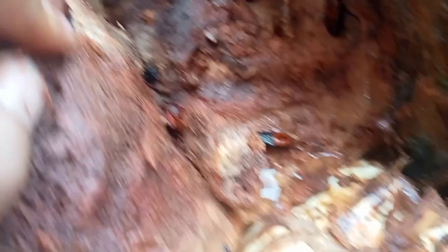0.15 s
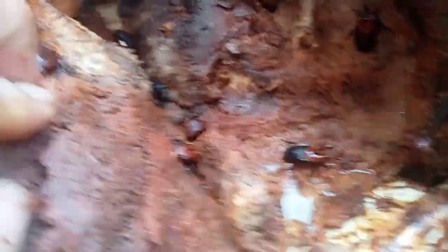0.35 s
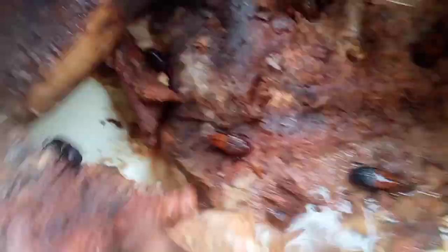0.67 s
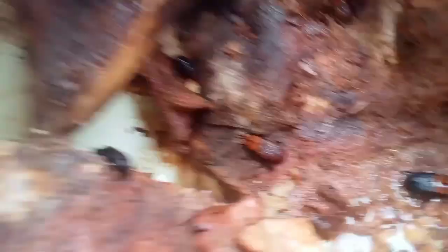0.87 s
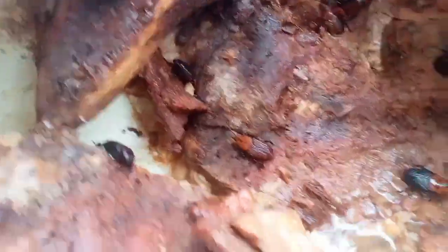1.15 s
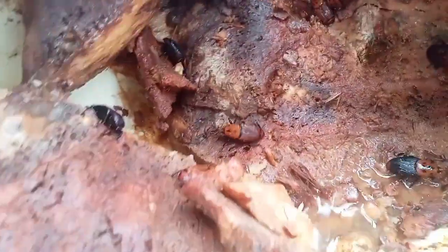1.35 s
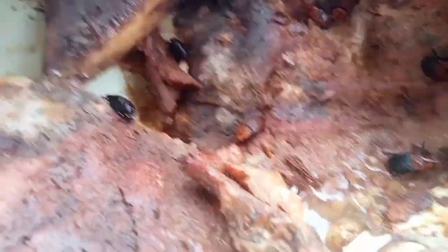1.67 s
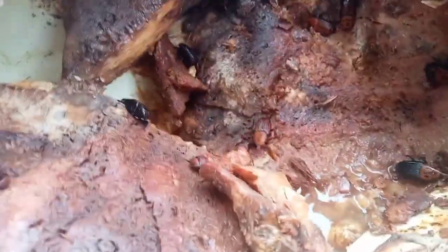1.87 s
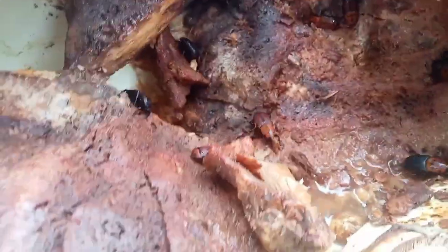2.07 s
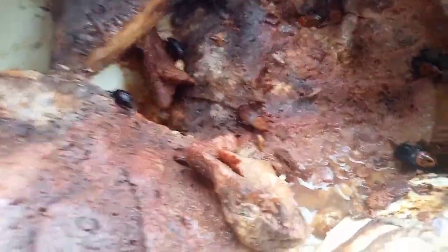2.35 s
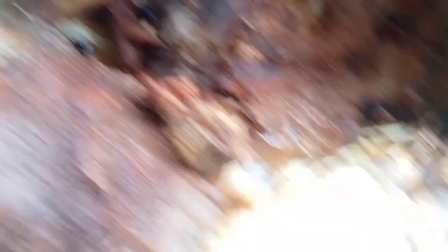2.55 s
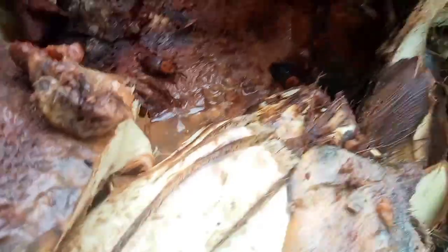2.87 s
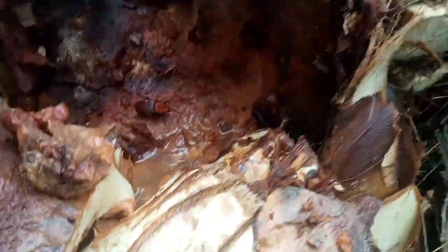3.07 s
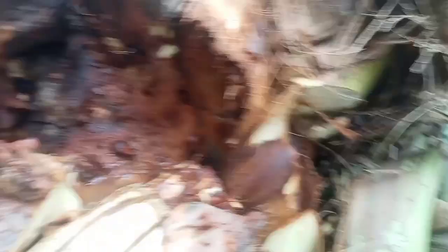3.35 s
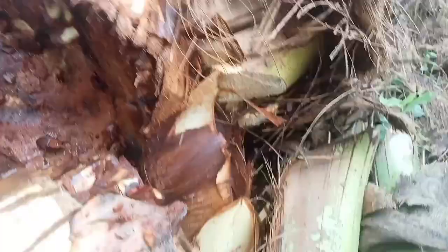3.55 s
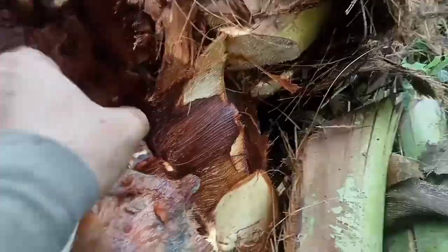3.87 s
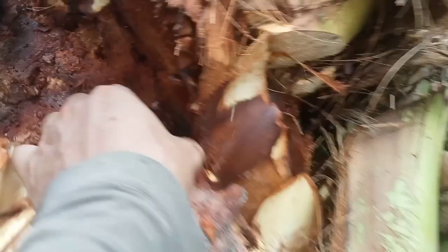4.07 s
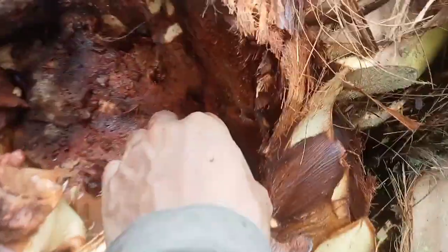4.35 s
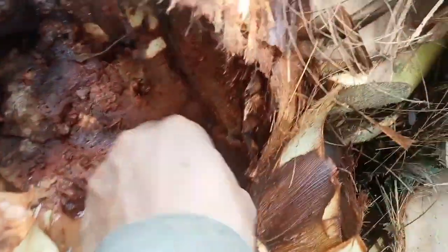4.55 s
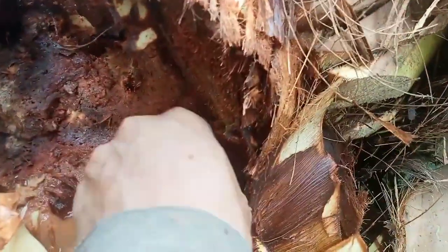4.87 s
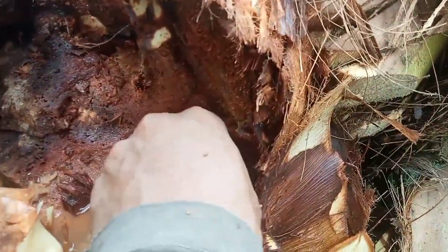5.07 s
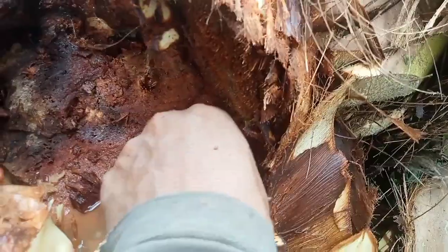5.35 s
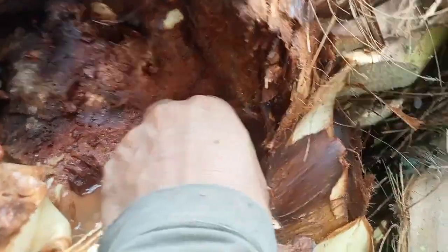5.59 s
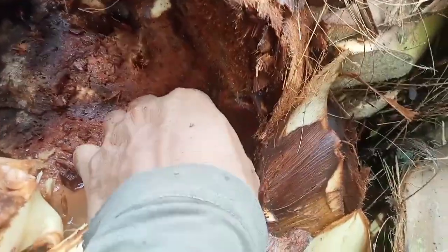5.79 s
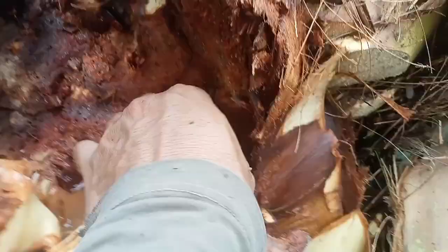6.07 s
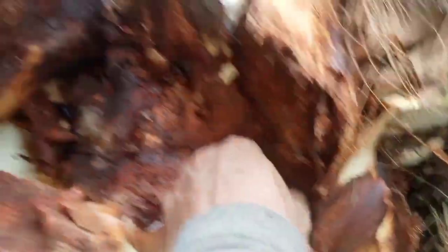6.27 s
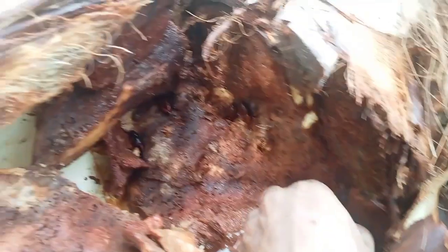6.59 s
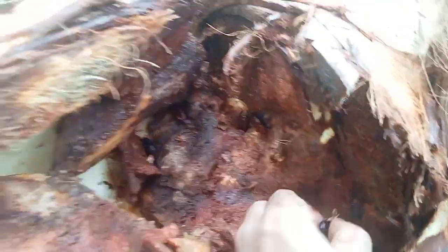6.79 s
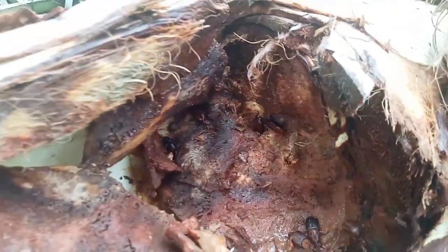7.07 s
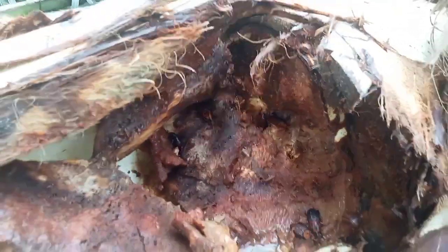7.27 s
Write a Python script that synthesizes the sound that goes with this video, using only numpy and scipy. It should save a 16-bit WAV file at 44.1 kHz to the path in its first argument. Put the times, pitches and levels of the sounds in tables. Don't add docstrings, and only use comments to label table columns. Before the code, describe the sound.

Close crackling and squelching of soggy plant fibre, a loud stalk crack with hollow knocks, then sparse plucks above faint chirring insects.

```python
import sys
import numpy as np
from scipy import signal
from scipy.fft import rfft, irfft, next_fast_len
from scipy.io import wavfile
from scipy.ndimage import uniform_filter1d

SR = 44100
rng = np.random.default_rng(int(sys.argv[2]) if len(sys.argv) > 2 else 0)


def voltage_ratio(level):
    return 10 ** (np.asarray(level, float) / 20)


def to_wav(sig):
    pcm = np.clip(np.atleast_2d(sig), -1, 1) * 32767
    pcm = np.round(pcm).astype(np.int16)
    wavfile.write(sys.argv[1], SR, pcm.T)


N = 327335
T = np.arange(N) / SR

# (pitch [Hz], level [dB])
AIR_COLOUR = [(200, -8.5), (500, 5), (1200, 4.5), (3000, 6), (6000, -46.5), (9000, -23), (13000, -4.5),
              (15500, 3.5)]
# (pitch [Hz], width [Hz], level [dB], flicker [dB])
INSECTS = [
    (2119, 130, -70, 2.5),
    (2260, 120, -70.5, 2),
    (3400, 330, -68, 0.5),
    (3515, 100, -70.5, 2.5),
    (4764, 470, -59, -5),
    (4845, 90, -65, 0.5),
    (5093, 93, -65, 5.5),
    (7135, 680, -59, 0),
    (9260, 400, -75.5, 2),
    (11250, 1200, -65.5, 1.5),
]
# (time [s], level below 6 kHz [dB], level above [dB])
PHONE_TURNS = [(0.0, 2.5, 0), (1.0, 2, -2.5), (2.0, 1.5, -2), (3.0, 0.6, -4.5), (4.0, 1.4, -1.6),
               (5.0, -1, -2.5), (6.0, 0.9, -2.5), (6.7, 0.3, -2), (7.42, 0, -2.5)]
# (time [s], throbs completed [count])
KATYDID_PACE = [(-.16, 0), (1.12, 6), (1.9, 10), (2.5, 13), (3.58, 18), (3.96, 20), (4.91, 24), (5.78, 28),
                (7.62, 37)]
# (start [s], end [s], first pitch [Hz], last pitch [Hz], level [dB])
BIRD_CALLS = [
    (2.23, 2.315, 6160, 6200, -58),
    (6.302, 6.43, 6100, 6050, -64),
    (6.42, 6.52, 6100, 5630, -66),
]
# (start [s], hardest [s], end [s], level [dB])
SLEEVE = [
    (1.3, 1.378, 1.44, -49),
    (3.331, 3.336, 3.35, -33),
    (3.35, 3.366, 3.389, -29.5),
]
# (pitch [Hz], level [dB])
SLEEVE_COLOUR = [(590, -25), (1000, -21), (2470, -16), (5590, -13), (6870, -2), (10100, -22.5),
                 (14500, -7.5), (15500, -6)]
# (pitch [Hz], level [dB])
BUFFET_COLOUR = [(15, -78.5), (25, -32), (92, 4), (141, 0.5), (260, -8), (442, -12.5), (640, -23.5),
                 (1320, -110)]
# (time [s], width [s], level [dB])
GRIPS = [
    (.87, 0.078, -50.5),
    (1.749, 0.047, -53),
    (1.98, 0.058, -55),
    (3.35, 0.012, -38),
    (3.504, 0.017, -41),
    (3.648, 0.056, -49),
    (7.2, 0.019, -63.5),
]
# (time [s], peak [dB])
SAP_BEADS = [
    (7.3524, -30),
    (7.3902, -23),
    (7.394, -18.5),
    (7.405, -27),
]
# (pitch [Hz], level [dB], time to fall 60 dB [s])
BEAD_MODES = [(5680, 9, 0.0086), (6200, -4, 0.0065), (4100, 1, 0.0033), (3300, -18, 0.0052)]
# (start [s], hardest [s], end [s], level [dB], pitch [Hz])
SEEPS = [(1.722, 1.738, 1.8, -46.5, 380), (1.827, 1.863, 1.87, -44.5, 477),
         (2.044, 2.083, 2.14, -51.5, 600), (2.19, 2.27, 2.25, -52.5, 492), (2.3, 2.37, 2.405, -47.5, 586),
         (2.508, 2.529, 2.55, -44, 498), (2.77, 2.85, 2.85, -62, 570), (2.98, 3.037, 3.12, -63.5, 595),
         (3.174, 3.21, 3.28, -56, 1400), (4.587, 4.602, 4.6, -47, 1300), (6.642, 6.679, 6.74, -57.5, 1350),
         (6.143, 6.3, 6.25, -58, 192)]
# (start [s], hardest [s], end [s], level [dB])
RUBS = [
    (3.759, 3.79, 3.79, -33.5),
    (3.893, 3.904, 4.02, -48),
    (4.023, 4.1, 4.2, -46.5),
    (4.187, 4.22, 6.1, -63.5),
    (5.125, 5.16, 5.1, -62.5),
    (6.767, 6.798, 6.82, -60),
    (6.87, 6.89, 6.93, -58),
    (7.203, 7.217, 7.3, -63),
]
# (pitch [Hz], width [Hz], level [dB])
HOLLOW = [(292, 50, 3.5), (751, 90, 1.5), (920, 130, -11), (1380, 270, -14), (2100, 460, -14)]
# (time [s], peak [dB], walls against boom [dB])
KNOCKS = [(3.65, -25.5, 12), (3.793, -28.5, 12.5), (3.8239, -29.5, 17.5), (3.8302, -43, 6),
          (3.889, -49, 10), (3.905, -37, 7.5), (3.928, -37.5, -2), (4.035, -47.5, 5), (4.055, -42.5, 3),
          (4.068, -50.5, 13), (4.093, -40.5, -3), (4.099, -46, 12), (4.114, -50, 9), (4.132, -52, 4),
          (4.154, -53, 6), (4.243, -48, -17), (4.305, -50.5, 0), (4.632, -47.5, -6), (5.149, -49.5, 0.5),
          (5.197, -57, 4), (5.339, -55.5, 6), (5.504, -54, 11.5), (5.671, -43, -9), (5.73, -63.5, 15),
          (5.812, -48, 3), (5.964, -43, 1), (6.258, -54, -7), (6.29, -50, 7), (6.79, -51.5, -5),
          (6.888, -49, -5), (7.207, -50, 9), (7.357, -45, 5)]
# (pitch [Hz], time to fall 60 dB [s])
CAVITY = (304.3, 0.082)
# (pitch [Hz], level [dB], time to fall 60 dB [s])
WALLS = [(738, -3, 0.04), (890, 6, 0.014)]
# (time [s], peak [dB])
SHEATH_RINGS = [
    (3.6344, -31),
    (3.6503, -17.5),
    (3.673, -35.5),
    (3.792, -27),
    (3.8245, -29.5),
    (3.831, -30.5),
    (3.904, -41),
]
# (pitch [Hz], level [dB], time to fall 60 dB [s])
SHEATH = [(936, -4, 0.15), (965, -12.5, .07), (795, -15.5, 0.041), (937, -17.5, .05), (1051, -9.5, 0.077),
          (1500, -12, 0.14), (1850, -12.5, 0.024), (2200, -10, 0.056), (2510, -9, 0.083)]
# (time [s], peak [dB], pitch [Hz], length [s])
SQUELCHES = [(0.134, -43, 328.5, 0.014), (0.14, -38, 554, 0.012), (0.65, -39, 940, 0.007),
             (0.812, -33.5, 700, 0.0091), (0.828, -32.5, 430, .012), (0.858, -14, 600, 0.0077),
             (0.867, -16.5, 396, 0.016), (0.971, -27, 600, 0.0074), (1.0536, -19.5, 450, 0.022),
             (1.125, -26, 496, 0.021), (1.15, -25, 492, 0.013), (1.737, -35, 410, 0.017),
             (1.761, -36, 400, 0.013), (1.779, -40.5, 296, 0.017), (1.866, -39, 463, 0.019),
             (1.936, -37.5, 670, 0.01), (1.976, -23, 691, 0.011), (1.987, -32.5, 456, 0.017),
             (2.129, -37.5, 590, 0.0105), (2.378, -28, 587, 0.0073), (2.381, -24, 624, 0.028),
             (2.45, -29, 650, 0.028), (2.458, -23.5, 458, 0.015), (2.481, -30, 520, 0.0066),
             (2.486, -30.5, 424, .015), (2.507, -35, 485, 0.0085), (2.512, -42, 641, 0.023),
             (2.689, -47, 285, 0.031)]
# (start [s], hardest [s], end [s], effort [dB], wetness [dB])
STROKES = [(0.276, 0.328, 0.4, -51, -3.5), (0.529, 0.735, 1.03, -57, -1.5), (0.673, 0.69, 0.735, -47.5, 0),
           (1.675, 1.712, 1.99, -64.5, 2), (1.824, 1.86, 1.91, -58.5, -1), (1.943, 1.988, 2.005, -61, 1),
           (2.045, 2.09, 2.35, -67, -1.5), (2.212, 2.25, 2.37, -66.5, -2), (2.349, 2.369, 2.46, -60, 0),
           (2.433, 2.454, 2.6, -61, -4), (2.803, 2.954, 3.01, -65, -12.5),
           (2.984, 3.224, 3.31, -60.5, -11.5), (3.208, 3.274, 3.18, -56.5, -18.5),
           (3.633, 3.643, 3.74, -47.5, -4.5), (3.71, 3.817, 3.84, -51.5, -3),
           (3.847, 3.914, 3.99, -61.5, -3.5), (4.051, 4.076, 4.14, -62, -1.5),
           (4.554, 4.596, 4.6, -55.5, -4.5), (4.656, 4.644, 4.55, -58, -9), (6.157, 6.308, 6.6, -65, 0),
           (6.63, 6.673, 6.6, -64, 2.5), (7.22, 7.374, 13.5, -67.5, -1)]
# (pitch [Hz], level [dB])
PULP = [(150, -44.5), (350, 1), (600, 1.5), (1000, -12), (2000, -47)]
# (pitch [Hz], level [dB])
FIBRE = [(600, -20.5), (1100, -10), (1800, -3.5), (3000, -8.5), (4500, -12.5), (6000, -29)]
# (pitch [Hz], level [dB])
FINE = [(3000, -23), (5500, -5), (7200, 6.5), (8800, -8.5), (12500, -16), (15000, -2)]
# (pitch [Hz], level [dB], time to fall 60 dB [s])
STRAND = [(264, -19.5, .05), (558, -12.5, 0.04), (700, -17.5, 0.046), (860, -15.5, 0.036), (1167, -4, .016),
          (1313, -6, 0.023), (1645, -0.5, 0.016), (1740, -7.5, 0.019), (2200, -5.5, 0.017),
          (2476, 0.5, 0.011), (3050, -6, .01), (3560, -8, 0.0096)]
# (pitch [Hz], level [dB], time to fall 60 dB [s])
SLIP_TICK = [(4300, -6.5, 0.0051), (5860, -1.5, .004), (7200, 13, .008), (8460, -3.5, .004)]
# (time [s], peak [dB], width [s])
POPS = [(0.6675, -10, .0001), (0.678, 1, .00009), (0.735, 1, .0001), (0.8696, -12, .00015),
        (3.6343, -5, .00005), (3.6348, -1, .00005), (3.6501, -4, .00014), (3.7913, -12, .00014),
        (3.7993, -18, .00012), (3.8247, -15, .00016), (3.8309, -15, .00014)]
# (time [s], peak [dB], pitch [Hz], time to fall 60 dB [s])
JABS = [(0.702, -19.5, 1550, .03), (0.7356, -4, 1708, 0.011), (0.8684, -18, 1920, 0.0091),
        (1.7297, -43.5, 1350, .015), (1.836, -39.5, 1690, 0.022), (1.8803, -34.5, 1860, .012),
        (1.884, -36, 2800, 0.006), (1.9597, -48, 1530, .012), (1.984, -31.5, 1500, .03),
        (2.0869, -44, 1500, .015), (2.325, -45, 2400, 0.013), (2.377, -38, 2340, .015),
        (2.452, -38, 1670, .02), (2.457, -34, 2580, .015), (2.482, -36, 2350, .03), (2.51, -43, 1527, .015),
        (3.773, -25, 1615, 0.024), (3.7912, -11.5, 1780, 0.008), (3.7995, -24, 1720, .012),
        (3.824, -18.5, 1850, .011), (3.8303, -19.5, 1720, 0.013), (3.845, -32, 1710, 0.014),
        (3.888, -35.5, 2200, .015), (3.911, -30.5, 1860, .014), (3.918, -36, 2100, .014),
        (3.934, -32, 2296, 0.013), (3.956, -39, 940, .02), (4.005, -49, 2260, 0.0096),
        (6.876, -51, 1800, 0.01), (6.95, -51, 1500, 0.0096), (0.134, -41, 1900, .02),
        (0.6766, -7.5, 2200, 0.016), (3.6505, -2, 2300, 0.012), (3.6529, -4, 1700, 0.014),
        (4.632, -35, 1370, 0.023), (4.6475, -33.5, 1500, 0.015), (4.67, -47, 2200, .015),
        (5.6742, -29.5, 1890, 0.014), (6.1155, -40.5, 1290, .01), (6.1722, -37, 2010, .01),
        (6.259, -25.5, 1880, 0.012), (6.2896, -33, 1970, .011), (6.317, -42, 2100, 0.014),
        (6.3498, -40, 2200, 0.016), (6.377, -41.5, 2200, .015), (6.4352, -35.5, 2170, 0.014),
        (6.8254, -45, 1450, 0.016)]
# (multiple of pitch [ratio], level [dB])
JAB_MODES = [(.53, -6), (.8, -5), (1, 6), (1.42, -8.5), (2.3, -14)]
# (time [s], peak [dB], body pitch [Hz], crack against body [dB])
SNAPS = [(0.1426, -29, 1490, 8.5), (0.2045, -39, 2000, 8), (0.211, -37, 1720, 9.5),
         (0.384, -24.5, 3480, 11.5), (0.6676, -9.5, 2110, -3), (0.676, -8, 1910, 7.5),
         (0.7353, -8.5, 4100, 4.5), (0.811, -22.5, 2280, 5.5), (0.824, -23.5, 1890, 6),
         (1.871, -29.5, 1280, -9), (1.935, -28.5, 1240, 3), (2.364, -31.5, 2270, -8),
         (2.4634, -27.5, 2260, -9), (3.661, -10, 1783, 3.5), (3.6736, -9.5, 1500, 4),
         (3.703, -36, 2170, 17.5), (3.737, -25, 4330, 5.5), (4.089, -38, 1120, 4), (4.581, -31, 3400, 8),
         (4.6314, -29, 3860, -1), (4.6355, -29.5, 2820, 8), (4.807, -34, 3560, 3.5), (5.674, -24, 1140, 4),
         (6.2217, -16, 3090, 1), (6.258, -28, 3540, 10)]
# (time [s], peak [dB], body pitch [Hz], crack against body [dB])
TEARS = [(0.6788, -10.5, 1038, -14), (0.7547, -23.5, 1500, -12.5), (0.8671, -25, 1650, -22),
         (1.0593, -24, 3300, -5), (1.974, -24, 1500, -12), (3.6343, -6.5, 4050, -12), (3.65, 3, 2270, 0),
         (3.7518, -14.5, 4300, -1.5), (3.7521, -22, 2530, -14.5), (3.7737, -16.5, 4250, -13),
         (3.792, -22.5, 2400, -13), (3.8243, -31.5, 2400, -12)]
# (time [s], peak [dB], body pitch [Hz], crack against body [dB])
SPLINTERS = [
    (0.0906, -31.5, 1790, 9),
    (0.1006, -38.5, 2057, 10),
    (6.405, -41, 2110, 9),
    (7.3533, -25.5, 3650, -3.5),
]
# (time [s], peak [dB], tick against body [dB])
HAIRS = [(0.0408, -41.5, -15), (0.1543, -40.5, -6), (0.311, -29, -11.5), (0.3483, -33.5, 7.5),
         (0.9572, -46, -18.5), (1.1658, -38.5, -9.5), (1.192, -38, -20), (1.702, -46, -17),
         (2.509, -38, -12.5), (2.532, -37, -22), (3.7805, -28.5, -12.5), (3.799, -32.5, -13),
         (3.824, -36.5, -13), (4.4884, -41, -8.5), (4.561, -47, -17), (5.1514, -41, -11),
         (5.165, -44.5, -27), (5.4225, -50, -13), (7.182, -51, -14), (7.238, -49, -9)]
# (time [s], peak [dB], pitch [Hz])
PLUCKS = [(0.204, -40, 1790), (0.7732, -19.5, 1594), (1.3174, -36, 970), (1.761, -39.5, 1465),
          (2.132, -37.5, 1590), (2.4185, -36.5, 2327), (3.9035, -43, 960), (3.9116, -35, 960),
          (3.9783, -43, 1870), (5.505, -41.5, 884), (5.735, -36.5, 1430), (5.8162, -42, 2200),
          (5.962, -41.5, 1710), (6.114, -39.5, 3400), (6.291, -33.5, 1030), (6.318, -42, 3900),
          (6.35, -35.5, 3700), (6.437, -40.5, 890), (7.205, -38.5, 1700), (7.2492, -42, 920)]
# (pitch [Hz], level [dB])
PHONE_PORT = [(3000, 0.5), (4900, 1), (5850, -7), (6600, 3), (9000, -6), (14000, -4.5)]
# (pitch [Hz], level [dB])
STALK_COLOUR = [(380, -0.5), (500, -6.5), (640, -0.5), (2900, 2), (3350, -1.5), (3800, 1)]


def evened(x):
    return x / np.sqrt(np.mean(x ** 2) + 1e-20)


def peaked(x):
    return x / (abs(x).max() + 1e-12)


def add(mix, s, sound):
    part = mix[round(s * SR):][:len(sound)]
    part += sound[:len(part)]


def curves(rows):
    s, *columns = np.transpose(rows)
    return [np.interp(T, s, column) for column in columns]


def coloured(x, points):
    hz, db = np.transpose(points)
    size = next_fast_len(len(x))
    bins = np.fft.rfftfreq(size, 1 / SR)
    gain = voltage_ratio(np.interp(np.log(bins + 1), np.log(hz), db))
    return evened(irfft(rfft(x, size) * gain, size)[:len(x)])


def recoloured(x, points):
    return coloured(x, points) * np.sqrt(np.mean(x ** 2))


def resonate(x, hz, width):
    r = np.exp(-np.pi * width / SR)
    return signal.lfilter([1, 0, -r], [1, -2 * r * np.cos(2 * np.pi * hz / SR), r * r], x)


def wobble(hz):
    smooth = [1, -np.exp(-2 * np.pi * hz / SR)]
    once = signal.lfilter([1], smooth, rng.standard_normal(N))
    return evened(signal.lfilter([1], smooth, once))


def ring(modes, t):
    return sum(voltage_ratio(db - 60 * t / t60) * np.sin(2 * np.pi * hz * t) for hz, db, t60 in modes)


def stroke(start, hardest, end, db, edge_db):
    levels = [db + edge_db, db, db + edge_db]
    return voltage_ratio(np.interp(T, [start, hardest, end], levels, -200, -200))


def insects():
    low_db, high_db = curves(PHONE_TURNS)
    out = voltage_ratio(-62) * coloured(rng.standard_normal(N), AIR_COLOUR)
    for hz, width, db, flicker_db in INSECTS:
        band = resonate(rng.standard_normal(N), hz, 1.25 * width)
        band = resonate(band, hz, 1.25 * width)
        turn_db = low_db if hz < 6000 else high_db
        flicker = np.clip(flicker_db, -1.6, 1.6) * wobble(25)
        drift = 1.6 * wobble(1.5)
        out += voltage_ratio(db + flicker + drift + turn_db) * evened(band)
    throbs, = curves(KATYDID_PACE)
    throb_db = 7.5 * np.cos(2 * np.pi * throbs)
    throb_db += 1.5 * np.cos(2 * np.pi * 52.5 * T) + 1.2 * wobble(3)
    wing_colour = [(11500, -42.5), (13000, -11.0), (14300, 9.5), (15200, 16.5), (16500, 2.5)]
    wing = coloured(rng.standard_normal(N), wing_colour)
    return out + voltage_ratio(-64.0 + throb_db) * wing


def bird():
    out = np.zeros(N)
    for start, end, from_hz, to_hz, db in BIRD_CALLS:
        hz = np.linspace(from_hz, to_hz, round((end - start) * SR))
        whistle = np.sin(2 * np.pi * np.cumsum(hz) / SR)
        add(out, start, voltage_ratio(db) * whistle * np.hanning(len(hz)))
    return out


def handling():
    cloth = coloured(rng.standard_normal(N) * voltage_ratio(1.1 * wobble(140)), SLEEVE_COLOUR)
    lumps = coloured(rng.standard_normal(N) * voltage_ratio(1.0 * wobble(5.3)), BUFFET_COLOUR)
    grips = sum(voltage_ratio(db) * np.exp(-((T - s) / width) ** 2) for s, width, db in GRIPS)
    brush = uniform_filter1d(sum(stroke(*row, -6.5) for row in SLEEVE), 180)
    thud_hz = 83.7
    thud = np.sin(2 * np.pi * thud_hz * T + 1.8 * wobble(16))
    thuds = grips * (0.94 * thud + 0.3 * lumps)
    breeze = voltage_ratio(-59 - 3 * T / T[-1]) * lumps
    return brush * cloth + breeze + thuds


def beads():
    out = np.zeros(N)
    burst = resonate(ring(BEAD_MODES, np.arange(900) / SR), 3390, 4920)
    pop = peaked(np.diff(burst, prepend=0))
    for s, db in SAP_BEADS:
        add(out, s, voltage_ratio(db) * pop)
    return out


def seeps():
    out = np.zeros(N)
    flow = rng.standard_normal(N) * voltage_ratio(3.5 * wobble(38))
    for *move, hz in SEEPS:
        gap = resonate(resonate(flow, hz, 0.5 * hz), hz, 0.65 * hz)
        out += stroke(*move, -9.0) * evened(gap)
    return out


def rubs():
    drag = rng.standard_normal(N) * voltage_ratio(2.6 * wobble(60))
    hollow = sum(voltage_ratio(db) * evened(resonate(drag, hz, width)) for hz, width, db in HOLLOW)
    effort = uniform_filter1d(sum(stroke(*row, -9.0) for row in RUBS), 200)
    return effort * evened(hollow)


def knocks():
    out, t = np.zeros(N), np.arange(8000) / SR
    cavity_hz, cavity_t60 = CAVITY
    boom = peaked(ring([(cavity_hz, 0, cavity_t60)], t) * (1 - np.exp(-t / 0.0015)))
    walls = peaked(ring(WALLS, t) * (1 - np.exp(-t / 0.0014)))
    for s, db, walls_db in KNOCKS:
        add(out, s, voltage_ratio(db) * (boom + voltage_ratio(walls_db) * walls))
    for (s, db), luck in zip(SHEATH_RINGS, rng.standard_normal(len(SHEATH_RINGS))):
        add(out, s, voltage_ratio(db) * ring(SHEATH, t * (1 + 0.006 * luck)))
    return out


def squelch():
    out = np.zeros(N)
    for (s, db, hz, length), grit in zip(SQUELCHES, rng.standard_normal((len(SQUELCHES), 3000))):
        t = np.arange(len(grit)) / SR
        u = t / np.clip(length, 0.005, 0.06)
        rough = evened(resonate(resonate(grit, hz, 0.4 * hz), hz, 0.58 * hz))
        glide = np.sin(2 * np.pi * hz * t * (1 + 0.0057 * u))
        push = np.sin(2 * np.pi * 0.4 * hz * t)
        tone = glide + 0.43 * rough + 0.22 * push
        add(out, s, voltage_ratio(db) * peaked(tone * u ** 1.6 * np.exp(-5.5 * u)))
    return out


def rustle():
    out, clumps, levels, grit = np.zeros(N), wobble(31), np.zeros((3, N)), np.ones(N)
    for start, hardest, end, db, wet_db in STROKES:
        shares = voltage_ratio(np.array([[wet_db], [0], [-0.3 * wet_db + 1.5]]))
        levels += shares * stroke(start, hardest, end, db, -12.5)
        grit[round(start * SR):round(end * SR)] = voltage_ratio(0.97 * wet_db)
    levels = uniform_filter1d(levels, 500, axis=1)
    for level, colour, grains_per_s in zip(levels, (PULP, FIBRE, FINE), (500.0, 900.0, 2200.0)):
        moments = rng.random(N) < grains_per_s / SR
        sizes = voltage_ratio(3.4 * np.minimum(rng.exponential(1, N), 2.3))
        grains = moments * sizes * rng.standard_normal(N)
        mix = grit * evened(grains) + 0.78 * rng.standard_normal(N)
        mix = mix / np.sqrt(grit ** 2 + 1.0)
        out += level * voltage_ratio(10.5) * coloured(mix * voltage_ratio(2.77 * grit * clumps), colour)
    return out


def creak():
    slips, slip_s, swell_s = 8, 0.011, 0.00085
    out, t, k = np.zeros(N), np.arange(1500) / SR, np.arange(slips)
    gaps = slip_s + 0.0033 * np.maximum(k - 4.5, 0)
    starts = 0.2813 + np.cumsum(gaps) - gaps
    levels = voltage_ratio(-12.5 - 16 * np.exp(-k / 2.6))
    swell = 0.23 + 1.0 * (1 - np.exp(-(t / swell_s) ** 2))
    strand = peaked(ring(STRAND, t) * swell) + voltage_ratio(-2.5) * peaked(ring(SLIP_TICK, t))
    habit = rng.standard_normal(170)
    for s, level, grit in zip(starts, levels, rng.standard_normal((slips, 170))):
        jerk = (0.02 * habit + 0.025 * grit) * np.hanning(len(grit))
        jerk = jerk + (t[:170] == 0)
        add(out, s, level * peaked(np.convolve(jerk, strand)))
    return out


def pops():
    out, t = np.zeros(N), np.arange(300) / SR
    echo_s, echo_db = 0.00126, -2.5
    for s, db, width in POPS:
        u = t / max(width, 4e-5)
        push = voltage_ratio(db) * peaked(u * (2 - u) * np.exp(-u))
        add(out, s, push)
        add(out, s + echo_s, voltage_ratio(echo_db) * push)
    return out


def jabs():
    out, t = np.zeros(N), np.arange(2000) / SR
    lucks = rng.standard_normal((len(JABS), len(JAB_MODES), 2))
    scatters = rng.standard_normal((len(JABS), 900))
    for (s, db, hz, t60), luck, scatter in zip(JABS, lucks, scatters):
        modes = []
        for (k, k_db), (pitch_luck, level_luck) in zip(JAB_MODES, luck):
            mode_hz = hz * k * (1 + 0.03 * pitch_luck)
            modes.append((mode_hz, k_db + 1.8 * level_luck, max(t60, 0.005) / np.sqrt(k)))
        paths = (t[:900] == 0) + voltage_ratio(-22 - 60 * t[:900] / 0.036) * scatter
        crack = ring(modes, t) * (1 - np.exp(-t / 0.0002))
        add(out, s, voltage_ratio(db) * peaked(np.convolve(crack, paths)))
    return out


def snap(noise, hz, crack_db, tick_db, damping, t60):
    t, t60 = np.arange(noise.shape[1]) / SR, np.clip(t60, 0.006, 0.15)
    fall = voltage_ratio(-60 * t / t60) + voltage_ratio(-16.0 - 60 * t / (5.5 * t60))
    tearing = noise * (1 + 0.71 * np.exp(-t / 0.00049))
    a, b, c = tearing + 8.2 * (t == 0)
    body = resonate(resonate(a * fall, hz, damping * hz), 0.67 * hz, 2.6 * damping * hz)
    crack = resonate(resonate(b * fall, 6620, 2700), 7450, 2000)
    tick = resonate(resonate(c * fall ** 1.5, 14700, 6000), 14700, 6000)
    return peaked(body) + voltage_ratio(crack_db) * peaked(crack) + voltage_ratio(tick_db) * peaked(tick)


def snaps():
    # (time [s], peak [dB], pitch [Hz], crack [dB], tick [dB], damping)
    rows = [(s, db, hz, crack - 5.0, -12 + 0.3 * crack, 0.75) for s, db, hz, crack in SNAPS]
    rows += [(s, db, hz, crack - 5.5, -12.5 + 0.3 * crack, 0.7) for s, db, hz, crack in TEARS]
    rows += [(s, db, hz, crack, crack + 6.5, 0.8) for s, db, hz, crack in SPLINTERS]
    rows += [(s, db - 4.0, 2600, 9.5, tick + 23.5, 0.8) for s, db, tick in HAIRS]
    rows += [(s, db, hz, -20.5, -28.5, 0.58) for s, db, hz in PLUCKS]
    out = np.zeros(N)
    for (s, db, hz, *edge), noise in zip(rows, rng.standard_normal((len(rows), 3, 4000))):
        t60 = 0.018 * (hz / 2000) ** -0.43
        add(out, s, voltage_ratio(db) * snap(noise, hz, *edge, t60))
    return out


def scene():
    hand = snaps() + creak() + squelch() + knocks() + jabs() + rubs() + pops() + seeps()
    no_bass = signal.butter(2, 130, "high", fs=SR, output="sos")
    hand = recoloured(signal.sosfilt(no_bass, hand), PHONE_PORT)
    rest = beads() + handling() + insects() + bird()
    hand = hand + rustle()
    reach_s = 3.45
    hand = np.where(T < reach_s, hand, recoloured(hand, STALK_COLOUR))
    return (hand + rest)[None]


def roll_off(x):
    return signal.sosfilt(signal.butter(12, 16800, fs=SR, output="sos"), x)


def record(dry):
    power_db = 10 * np.log10(abs(uniform_filter1d(dry[0] ** 2, 200)) + 1e-12)
    fall = T * 60.0
    held_db = np.maximum.accumulate(power_db + fall) - fall
    over_db = np.maximum(held_db + 26.0, 0)
    ducked = dry / voltage_ratio(0.34 * signal.lfilter(np.ones(900) / 900, 1, over_db))
    limited = np.tanh(ducked)
    edge = signal.firwin(511, 15500, window=("kaiser", 5), fs=SR)
    mix = signal.oaconvolve(limited, edge[None], "same")
    return roll_off(mix)


dry = scene()
out = record(dry)
to_wav(out)
```